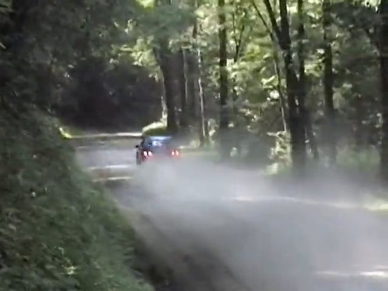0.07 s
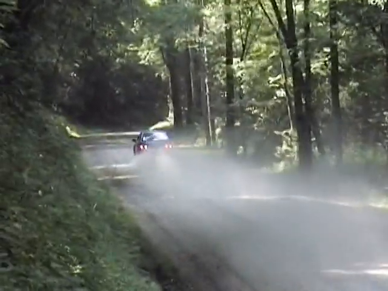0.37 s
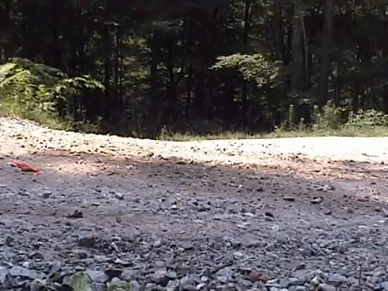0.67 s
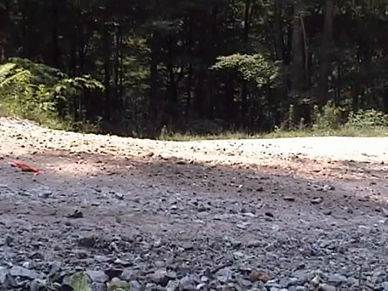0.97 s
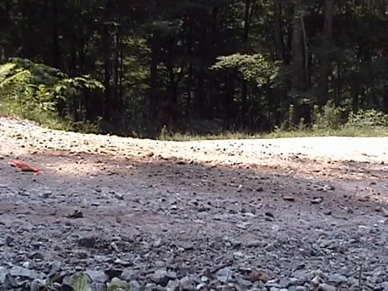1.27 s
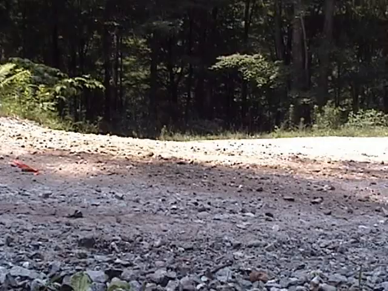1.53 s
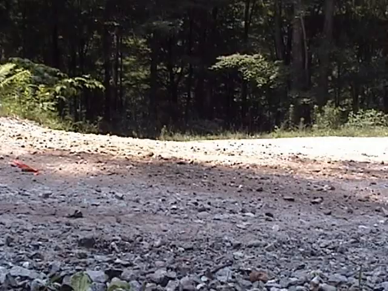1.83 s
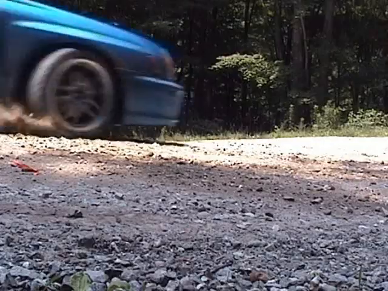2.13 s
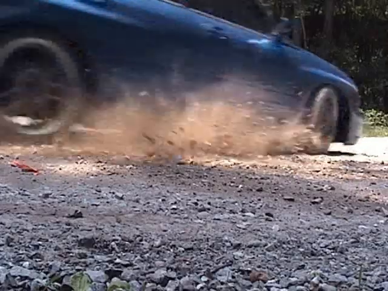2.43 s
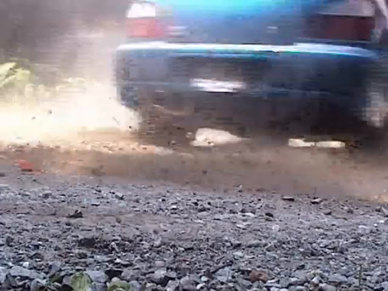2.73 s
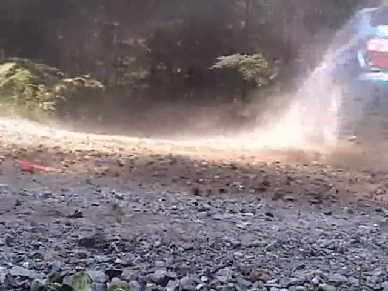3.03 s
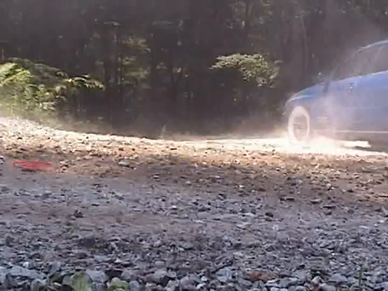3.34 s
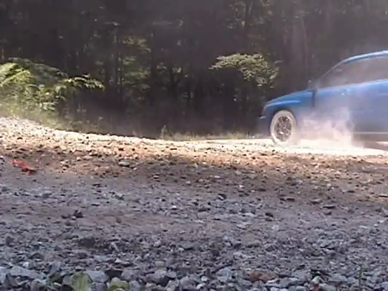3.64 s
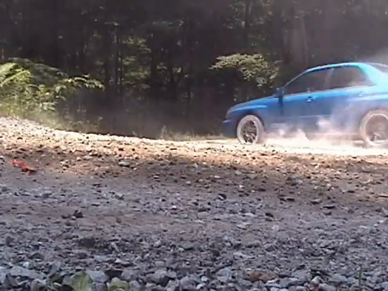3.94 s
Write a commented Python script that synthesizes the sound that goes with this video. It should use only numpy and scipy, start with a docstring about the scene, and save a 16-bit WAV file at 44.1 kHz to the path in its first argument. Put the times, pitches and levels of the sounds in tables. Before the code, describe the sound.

A rally car drones faintly in the distance, its exhaust popping once at 0.2 seconds. At 0.6 the sound cuts closer: the engine slows while tyres roar and crunch over gravel, swelling from 1.3. Between 2 and 3 seconds the car passes close, with stones clicking, knocking underneath and grit showering down. From 2.5 the burbling engine revs up and pulls away, with a brief wind buffet near 3.8.

```python
"""Rally car on forest gravel

Two shots. Far off, the car drones away and its exhaust pops once. After a cut it slides in off the
throttle, gravel roaring under droning tyres, passes close and pulls away with a lumpy flat-four
burble from its unequal pipes. Stones tick and knock, and thrown grit showers down near the microphone."""
import sys
import numpy as np
from scipy import signal
from scipy.fft import rfft, irfft
from scipy.io import wavfile
from scipy.ndimage import map_coordinates

SR = 44100
rng = np.random.default_rng(int(sys.argv[2]) if len(sys.argv) > 2 else 0)


def output_pcm(signal):
    """Save a mono or channel-first signal as 16-bit PCM at the path in sys.argv[1].

    Samples are clipped to [-1, 1] before scaling.
    """
    pcm = np.clip(np.atleast_2d(signal).T, -1, 1) * 32767
    wavfile.write(sys.argv[1], SR, np.round(pcm).astype(np.int16))


N = 176400
T = np.arange(N) / SR
CUT_S, POP_S = .568, .193
SCATTER_SAMPLES = 1.1  # spread of the left-right delay from stone to stone

# Faint steady whine of the far shot: f/Hz, level/dB
WHINE_TONES = [(10497, -87), (11999, -80)]
# Exhaust lines, far and near; unequal pipes feed the odd ones: multiple of the engine cycle, level/dB
FAR_EXHAUST_LINES = [(2, -17), (3, -1.5), (4, 1.5), (5, -0.5), (6, -8), (7, -0.5), (8, -11), (13, -4.5)]
NEAR_EXHAUST_LINES = [(3, -28.5), (4, 4.5), (5, -10.5), (6, -17), (7, -3.5), (8, -3), (9, -2), (11, -20.5),
                      (12, -2.5), (13, -12.5), (16, -11), (19, -12.5)]
# Colours of the distant gravel wash and the exhaust pop: f/Hz, level/dB
FAR_WASH_SPECTRUM = [(35, -42), (60, -22), (119, -12), (292, -15.5), (412, -12.5), (449, -16), (689, -10.5),
                     (1370, -20.5), (2190, -27), (9500, -51), (15000, -82)]
POP_SPECTRUM = [(250, -42), (508, -10), (703, -13), (1050, -8.5), (1390, -14), (1720, -16), (3780, -39),
                (5070, -49), (10000, -54)]
# Stones striking the distant car: t/s
FAR_TICK_TIMES = [.151, .284, .305]
# Colours of the gust, the road rumble and the churning gravel: f/Hz, level/dB
GUST_SPECTRUM = [(15, -32), (35, -11), (60, -8), (150, -22), (400, -71)]
RUMBLE_SPECTRUM = [(20, -17), (40, -2.5), (70, -1.5), (105, 0), (170, 1.5), (250, -3.5), (340, -14),
                   (600, -40)]
ROAR_SPECTRUM = [(160, -23.5), (265, 0.5), (350, -3), (458, -1.5), (530, -3.5), (675, -4), (1010, -9),
                 (1300, -16), (1620, -27), (2860, -38)]
# Faders for the road rumble and the churning gravel: t/s, level/dB
RUMBLE_FADER = [(.57, -34), (1.17, -27.5), (1.33, -16.5), (1.47, -25), (1.65, -20), (2.1, -18.5),
                (2.5, -19), (2.9, -25.5), (4, -22)]
ROAR_FADER = [(.58, -32), (.8, -26.5), (1.1, -19.5), (1.2, -21), (1.26, -17), (1.35, -11.5), (1.44, -17.5),
              (1.6, -16), (1.95, -16), (2.23, -18), (2.42, -23), (2.65, -25.5), (3.0, -25), (3.35, -29),
              (3.5, -36), (3.68, -25), (4, -46)]
# Tread drone as the braking wheels slow: t/s, f/Hz, level/dB
TREAD_DRONE = [(1.2, 335, -42), (1.39, 293.7, -22.5), (1.5, 255.2, -26.5), (1.62, 221.9, -19.5),
               (1.72, 228, -22.5), (1.82, 240, -24), (2.0, 226, -26.5), (2.22, 226, -36),
               (2.32, 214.7, -60)]
# Faders for crunching stones and hissing sand: t/s, crunch level/dB, hiss level/dB
GRIT_FADERS = [(0.6, -45.5, -57), (0.76, -44.5, -50), (1.01, -42, -45.5), (1.48, -37, -39.5),
               (1.64, -31.5, -34), (1.81, -32, -31.5), (2.27, -29, -37), (2.57, -37.5, -40),
               (2.85, -43, -43.5), (3.42, -44, -43), (3.81, -46.5, -50.5), (3.97, -47.5, -54.5)]
# Colours of stone crunch, sand hiss and settling sand: f/Hz, level/dB
CRUNCH_SPECTRUM = [(900, -20.5), (1700, -5.5), (2900, -0.5), (4500, -1), (6500, -0.5), (8500, -9.5),
                   (14000, -48)]
HISS_SPECTRUM = [(4000, 4), (7800, 2), (9600, 8), (11200, 5.5), (13000, -3), (15500, -12)]
SAND_SPECTRUM = [(2500, -16), (4500, -1.5), (6500, -1), (8500, -4), (13000, -5)]
# Showers of thrown grit: t/s, hold/s, level/dB, centre f/Hz, width/octaves
GRIT_SHOWERS = [(1.455, 0.029, -17, 3703, 2.2), (1.516, .005, -23.5, 9000, 0.71),
                (1.72, 0.065, -26.5, 10380, 0.53), (2.024, 0.016, -24, 3164, 0.72),
                (2.167, 0.024, -26.5, 6660, 0.28), (2.361, 0.041, -21, 5260, 1.01),
                (2.47, 0.021, -23.5, 4810, 0.99), (2.648, 0.0073, -30, 6960, 1.1),
                (2.84, .005, -25.5, 11000, 0.47), (3.392, 0.005, -22, 11300, 0.34),
                (3.422, 0.0065, -26.5, 8900, 1.05), (3.439, 0.0033, -23.5, 11100, 0.34),
                (3.469, 0.014, -25.5, 10000, 0.68), (3.492, 0.011, -34.5, 3650, 0.34),
                (3.518, 0.02, -23, 7600, 0.64), (3.564, .005, -26.5, 10500, 0.45),
                (3.792, 0.011, -35.5, 3650, 1.4)]
# Single flung stones: t/s, level/dB, ring f/Hz, T60/s
FLUNG_STONES = [(.752, -27, 2600, 0.1), (0.813, -26, 2697, 0.067), (0.937, -18, 8950, 0.025),
                (0.984, -25, 2493, .06), (1.409, -17, 9940, .012), (1.519, -11.5, 4740, 0.043),
                (1.924, -10, 5940, 0.018), (2.179, -14, 5160, 0.044), (1.595, -9, 10400, 0.012),
                (2.0345, -10, 2930, 0.012), (2.046, -8, 3006, 0.017), (2.056, -8, 2700, 0.0084),
                (2.096, -13, 3167, 0.031), (2.1074, -10, 3310, .01), (2.249, -21, 3500, .015),
                (2.31, -16, 2800, 0.02), (2.3344, -9, 2900, 0.012), (2.346, -7, 3840, 0.016),
                (2.3753, -9, 5530, .01), (2.43, -9, 2860, 0.014), (2.453, -8, 3100, 0.0089),
                (2.513, -7.5, 7000, 0.0078), (2.589, -12, 3030, 0.012), (2.669, -9, 4230, 0.011),
                (2.762, -13.5, 3800, 0.011), (2.861, -12, 4340, 0.0091), (2.916, -16.5, 4860, .026),
                (3.097, -23, 4000, 0.022)]
# Large stones hitting the underbody: t/s, level/dB
UNDERBODY_HITS = [(0.89, -14), (.939, -17), (2.228, -6.5), (2.594, -8), (2.846, -10), (2.889, -9.5),
                  (2.992, -13), (3.336, -11), (3.47, -31), (3.739, -26), (3.789, -15), (3.934, -22)]
# Colour of their thud: f/Hz, level/dB
THUD_SPECTRUM = [(300, -1), (650, 7.5), (1100, -9), (1600, -19.5)]
# The near engine slowing, then pulling: t/s, firing f/Hz, level/dB
ENGINE_REVS = [(.57, 64.3, -26), (.78, 58.95, -26.5), (1.0, 48.94, -24), (1.3, 42.18, -24),
               (2.25, 43.08, -27), (2.48, 46.2, -16.5), (2.6, 51.5, -14.5), (2.7, 61.56, -15.5),
               (2.8, 65.5, -13.5), (3.0, 68.34, -17), (3.28, 70, -16), (3.43, 76.03, -18),
               (3.62, 78.4, -17), (3.8, 81.77, -20), (4.0, 88.3, -19)]
# Exhaust pipe resonances: f/Hz, half-width/Hz, added gain
PIPE_RESONANCES = [(113.4, 16.5, 0.82), (163.6, 22, 0.3), (252, 29.5, 0.79), (490, 51, 0.52)]
# Colour of the exhaust gas puffs: f/Hz, level/dB
RASP_SPECTRUM = [(235, -24.5), (330, 2.5), (385, 1), (430, -2.5), (480, 5.5), (550, -3.5), (625, 1),
                 (720, -5), (900, -10), (1230, -21.5), (1550, -40.5)]
# The passing car's sound reaches the right channel late: t/s, lag/samples
RIGHT_LAG = [(.6, 3.3), (2.2, 1.53), (2.8, 0.086), (4, 0.18)]


def undb(db):
    """Decibels to gain."""
    return 10 ** (np.asarray(db) / 20)


def unit(x):
    """Scale to rms 1."""
    return x / np.sqrt(np.mean(x ** 2) + 1e-18)


def curve(rows, column=1):
    """One column of a table, joined by straight lines in time."""
    rows = np.array(rows)
    return np.interp(T, rows[:, 0], rows[:, column])


def wander(rate_hz):
    """Smooth random drift with a spread near 1."""
    return 1.19 * map_coordinates(rng.standard_normal(1024), [T * rate_hz], order=2, mode="mirror")


def minimum_phase(log_gain):
    """Complex response with these magnitudes that starts sharply and rings out."""
    cepstrum = irfft(log_gain)
    half = len(cepstrum) // 2
    return np.exp(rfft(np.r_[cepstrum[0], 2 * cepstrum[1:half], np.zeros(half)]))


def colour(x, spectrum):
    """Equalise to a spectrum, rolling off beyond its ends; the result has rms 1."""
    hz, db = np.array(sorted(spectrum)).T
    f = np.maximum(np.fft.rfftfreq(8192, 1 / SR), 1)
    octaves_outside = np.maximum(np.log2(hz[0] / f), 0) + np.maximum(np.log2(f / hz[-1]), 0)
    gain_db = np.interp(np.log(f), np.log(hz), db) - 18 * np.minimum(octaves_outside, 3)
    impulse = irfft(minimum_phase(np.log(undb(gain_db))))
    return unit(signal.fftconvolve(x, impulse[None], axes=1)[:, :x.shape[1]])


def impacts(per_s, spread_db):
    """Random contacts of unequal size, each from its own direction."""
    chance, size, side = rng.random(N), rng.standard_normal(N), rng.standard_normal(N)
    at = np.flatnonzero(chance < per_s / SR)
    push = np.sign(rng.standard_normal(N)[at]) * undb(spread_db * np.minimum(size[at], 2.3))
    lag = np.rint(SCATTER_SAMPLES * side[at]).astype(int)
    return np.array([np.bincount(at, push, N), np.bincount(np.clip(at + lag, 0, N - 1), push, N)])


def noise(spectrum, width):
    """Coloured stereo noise; width 0 is mono."""
    mid, side = rng.standard_normal((2, N))
    return colour(np.array([mid + width * side, mid - width * side]), spectrum)


def burst(t, hold, t60):
    """Envelope: 1 ms attack, hold, decay."""
    return np.clip(t * 1000, 0, 1) * undb(-60 * np.maximum(t - hold, 0) / t60)


def add(out, start_s, x):
    """Mix a short sound in at a time."""
    i = int(np.clip(start_s * SR, 0, N - 1))
    out[:, i:i + x.shape[1]] += x[:, :N - i]


def whine():
    """Thin steady tones high above the far shot."""
    return sum(undb(db) * np.sqrt(2) * np.sin(2 * np.pi * hz * T) for hz, db in WHINE_TONES)


def far_car():
    """Far down the road: a sagging drone, a gravel wash, stone ticks and a spray of grit at the pop."""
    tone, _ = exhaust(firing_hz=130.3 - 7.5 * T, orders=FAR_EXHAUST_LINES)
    wash = noise(FAR_WASH_SPECTRUM, width=.17)
    ticks = undb(-40.5) * sum(burst(T - at, 0, t60=.052) / (1 + k) for k, at in enumerate(FAR_TICK_TIMES))
    spray = undb(-51.5) * burst(T - POP_S, hold=.063, t60=.44)
    grit = colour(impacts(per_s=3900, spread_db=4), CRUNCH_SPECTRUM)
    return undb(-38) * (unit(tone) + wash) + grit * (ticks + spray)


def exhaust_pop(ring_hz=1075, hold_s=.0062):
    """One distant, ringing bang that the trees echo."""
    t = T - POP_S
    ring = undb(-5) * np.sin(2 * np.pi * ring_hz * T) * burst(t, hold_s, t60=.083)
    bang = noise(POP_SPECTRUM, width=.54) * burst(t, hold_s, t60=.055)
    echo = undb(-14.5) * noise(POP_SPECTRUM, width=.4) * burst(t, 0, t60=.29)
    return undb(-21) * (ring + bang + echo)


def wake(peak_s=3.78, swell_s=.068):
    """Moving air buffets the microphone."""
    return undb(-14.5) * noise(GUST_SPECTRUM, width=.89) * np.exp(-((T - peak_s) / swell_s) ** 2)


def settling_sand(peak_s=3.01, swell_s=.83):
    """Sand rains down behind the car."""
    grains = colour(impacts(per_s=1100, spread_db=4.5), SAND_SPECTRUM)
    return undb(-37.5) * grains * np.exp(-((T - peak_s) / swell_s) ** 2)


def stone(hz, t60, full_ring_s=.032, crack_s=.0024):
    """One stone: a contact snap, a dry crack and a rough ring, weaker when shorter than full_ring_s."""
    t = T[:4096]
    roughness = .055 * hz / 4000 * np.cumsum(rng.standard_normal(len(t)))  # phase drift blurs the pitch
    tone = np.sin(2 * np.pi * hz * t + roughness)
    ring = .59 * min(t60 / full_ring_s, 1) * tone * undb(-60 * t / t60)
    band = signal.butter(2, [hz * .65, min(hz * 2.6, 15000)], "band", fs=SR, output="sos")
    crack = .37 * unit(signal.sosfilt(band, rng.standard_normal(len(t)))) * np.exp(-t / crack_s)
    snap = .46 * tone * np.exp(-hz * t)
    hit = np.pad(snap + crack + ring, 16)
    return np.array([hit, np.roll(hit, round(SCATTER_SAMPLES * rng.standard_normal()))])


def gravel(pebbles_per_s=190, low_hz=2247, high_hz=7970, ring_cycles=70):
    """Crunching stones, hissing sand and pebbles that clink as they land."""
    contacts = impacts(per_s=5000, spread_db=1.5) * undb(.99 * wander(60))
    pebbles = np.zeros((2, N))
    for when, pitch, size in rng.random((1500, 3))[:int(pebbles_per_s * N / SR)]:
        hz = low_hz * (high_hz / low_hz) ** pitch
        add(pebbles, when * N / SR, undb(20 * size ** 3) * stone(hz, ring_cycles / hz))
    crunch = undb(3) * colour(contacts, CRUNCH_SPECTRUM) + undb(-3.5) * unit(pebbles)
    hiss = undb(4) * colour(contacts, HISS_SPECTRUM)
    return crunch * undb(curve(GRIT_FADERS)) + hiss * undb(curve(GRIT_FADERS, column=2))


def thrown_grit():
    """The wheels fling up showers of grit and single stones."""
    out, t = np.zeros((2, N)), T[:SR // 4]
    grit = impacts(per_s=6000, spread_db=6)
    for at, hold, db, hz, octaves in GRIT_SHOWERS:
        spectrum = [(hz * 2 ** (widths * octaves), drop_db)
                    for widths, drop_db in [(-4, -32), (-1, -6), (0, 0), (1, -7), (3, -28)]]
        envelope = burst(t, hold, t60=.084) * np.minimum(t / (.25 * hold), 1)
        i = min(int(at * SR), N - len(t))
        add(out, at, undb(db) * colour(grit[:, i:i + len(t)], spectrum) * envelope)
    for at, db, hz, t60 in FLUNG_STONES:
        add(out, at, undb(db) * stone(hz, t60))
    return out


def underbody_knocks():
    """Large stones thud against the underbody: one hard push, then a short rattle."""
    out, t = np.zeros((2, N)), T[:8192]
    for at, db in UNDERBODY_HITS:
        rattle = .026 * rng.standard_normal((1, len(t))) * burst(t, 0, t60=.14)
        thud = colour((t == 0) + rattle, THUD_SPECTRUM)
        add(out, at, undb(db) * thud / np.abs(thud).max())
    return out


def tread(wobble=.012, flutter_db=2):
    """The tread blocks drone unsteadily, falling in pitch under braking."""
    phase = 2 * np.pi * np.cumsum(curve(TREAD_DRONE) * (1 + wobble * wander(40))) / SR
    tone = unit(np.sin(phase) + undb(-7) * np.sin(2 * phase))
    braking = (T > TREAD_DRONE[0][0]) & (T < TREAD_DRONE[-1][0])
    return braking * tone * undb(curve(TREAD_DRONE, column=2) + flutter_db * wander(40))


def tyres(leaving_s=2.87, dull_hz=705):
    """Road rumble and the roar of gravel churned under the wheels, which dulls as the car draws away."""
    rumble = noise(RUMBLE_SPECTRUM, width=.28) * undb(curve(RUMBLE_FADER))
    churn = colour(impacts(per_s=2800, spread_db=4), ROAR_SPECTRUM)
    roar = churn + undb(-16.5) * noise(ROAR_SPECTRUM, width=.31)
    dull = signal.sosfilt(signal.butter(1, dull_hz, fs=SR, output="sos"), roar)
    away = np.clip((T - leaving_s) / 1.2, 0, 1)
    return rumble + (roar + away * (dull - roar)) * undb(curve(ROAR_FADER) + 1.2 * wander(34.67))


def exhaust(firing_hz, orders, wobble=.0035, flutter_db=1.2, cycle_start_s=2.978, bass_edge_hz=59.4):
    """Tone and cycle count: four firings make one lumpy cycle, whose lines swell at pipe resonances."""
    cycle_hz = firing_hz * (1 + wobble * wander(14)) / 4
    cycles = np.cumsum(cycle_hz) / SR
    cycles -= np.interp(cycle_start_s, T, cycles)
    gains = np.full(129, .03)
    for k, db in orders:
        gains[k] = undb(db)
    response, tone = minimum_phase(np.log(gains)), 0
    for k, _ in orders:
        line_hz = k * cycle_hz
        pipe = 1 + sum(boost / (1 + ((line_hz - hz) / width) ** 2) for hz, width, boost in PIPE_RESONANCES)
        pipe /= np.sqrt(1 + (bass_edge_hz / line_hz) ** 6)  # the microphone takes in little deep bass
        line = np.real(response[k] * np.exp(2j * np.pi * k * cycles))
        tone -= pipe * undb(flutter_db * wander(15)) * line
    return tone / np.sqrt(np.sum(gains ** 2) / 2), cycles


def engine(puff_decay=.6, growl_share=.67, rasp_db=-8.5, forest_db=-23):
    """The close burble, with a growling puff of gas after each firing and an echo from the trees."""
    tone, cycles = exhaust(curve(ENGINE_REVS), NEAR_EXHAUST_LINES)
    since_firing = 4 * cycles % 1  # in firing periods
    puff = np.exp(-since_firing / puff_decay)
    cycle_noise = map_coordinates(rng.standard_normal(160), [cycles % 1 * 160], mode="grid-wrap")
    growl = colour((puff * cycle_noise)[None], RASP_SPECTRUM)  # repeats every cycle
    gas = colour((puff * rng.standard_normal(N))[None], RASP_SPECTRUM)
    rasp = np.sqrt(growl_share) * growl + np.sqrt(1 - growl_share) * gas
    direct = (tone + undb(rasp_db) * rasp) * undb(curve(ENGINE_REVS, column=2))
    trees = rng.standard_normal((2, SR // 2)) * burst(T[:SR // 2] - .02, 0, t60=.45)
    echo = signal.fftconvolve(direct, trees / np.sqrt(np.sum(trees ** 2) / 2), axes=1)[:, :N]
    return direct + undb(forest_db) * echo


def scene(lean_db=2.5, lean_below_hz=1800, gap_s=.008):
    """The far shot, a cut, then the close pass: earlier on the left, with its lows leaning that way."""
    near = engine() + tyres() + tread() + wake() + gravel()
    near += thrown_grit() + settling_sand() + underbody_knocks()
    balance_db = lean_db / (1 + (np.fft.rfftfreq(N, 1 / SR) / lean_below_hz) ** 4)
    left, right = irfft(rfft(near) * undb(np.array([balance_db, -balance_db]) / 2), N)
    right = map_coordinates(right, [T * SR - curve(RIGHT_LAG)], order=5, mode="nearest")
    far = far_car() + exhaust_pop() + whine()
    return far * (T < CUT_S - gap_s) + np.array([left, right]) * np.clip((T - CUT_S) / .003, 0, 1)


def record(dry, soften_hz=13700, top_hz=15300):
    """The microphone chain softens the highest treble, clips the highest peaks and cuts the top."""
    soft = signal.sosfilt(signal.butter(2, soften_hz, fs=SR, output="sos"), dry)
    return signal.sosfilt(signal.ellip(8, .2, 70, top_hz, fs=SR, output="sos"), np.clip(soft, -1, 1))


dry = scene()
out = record(dry)
output_pcm(out)
```